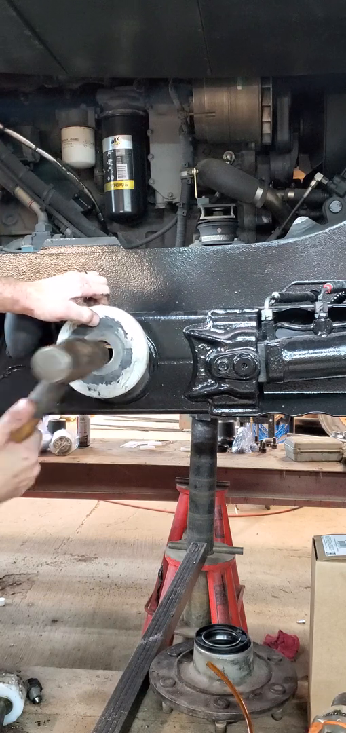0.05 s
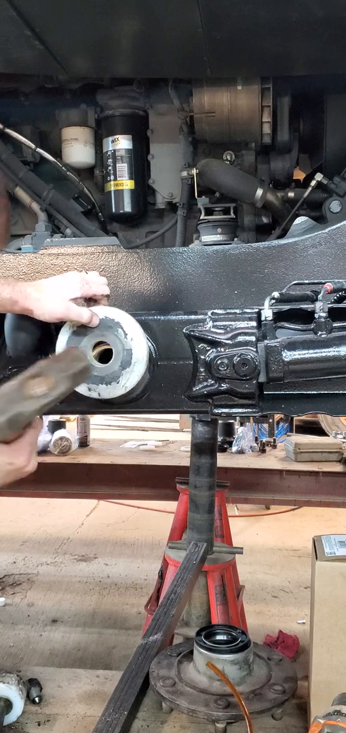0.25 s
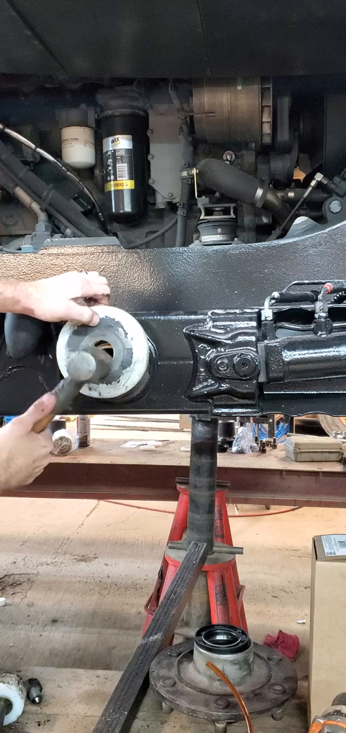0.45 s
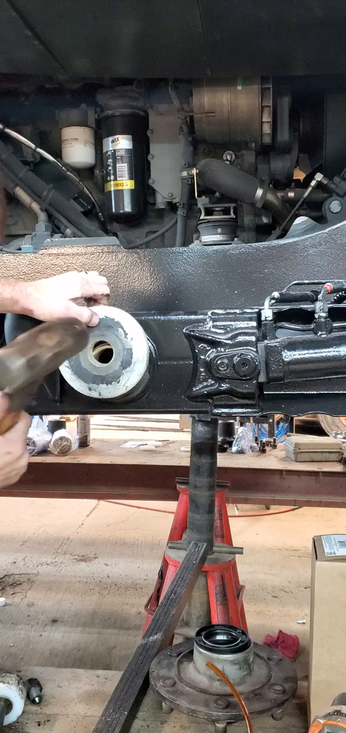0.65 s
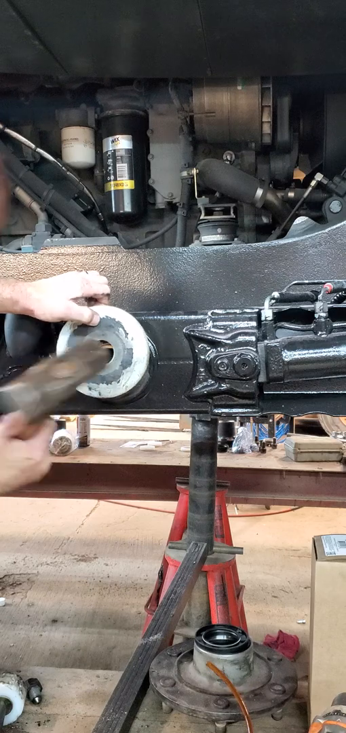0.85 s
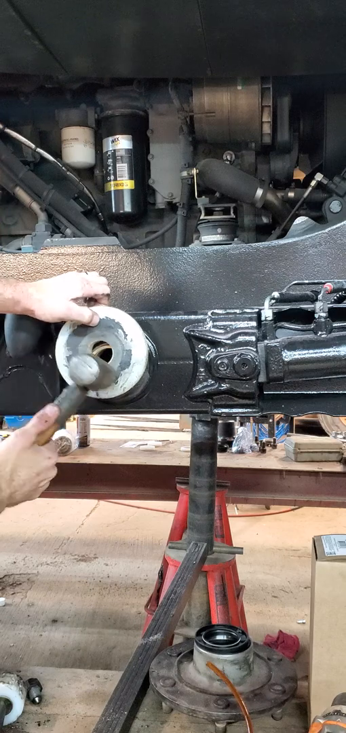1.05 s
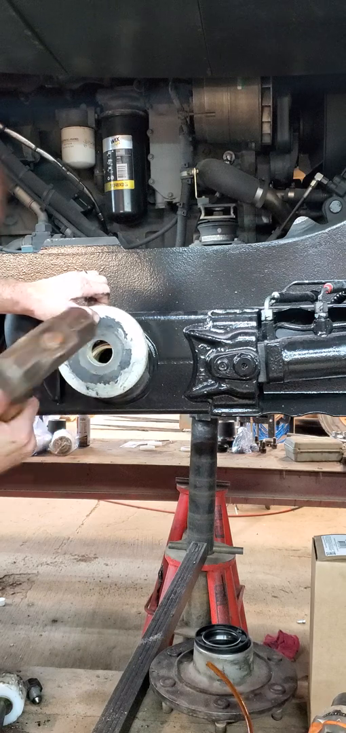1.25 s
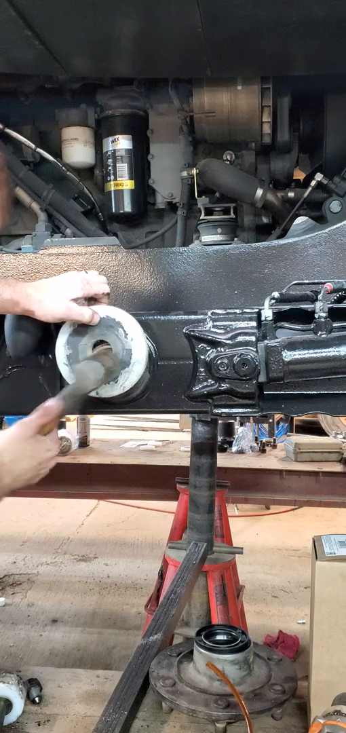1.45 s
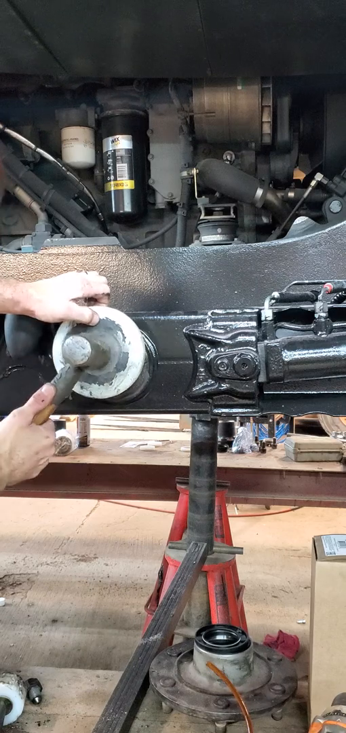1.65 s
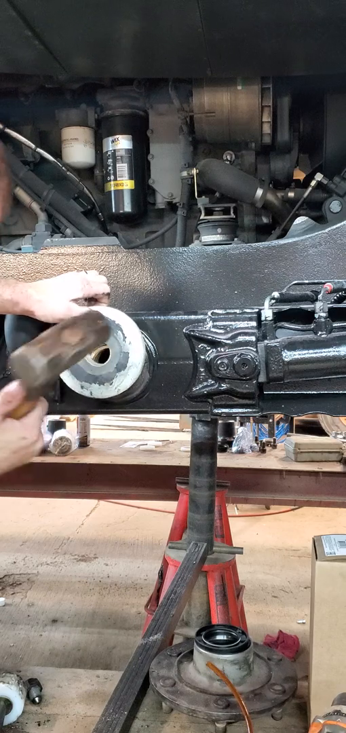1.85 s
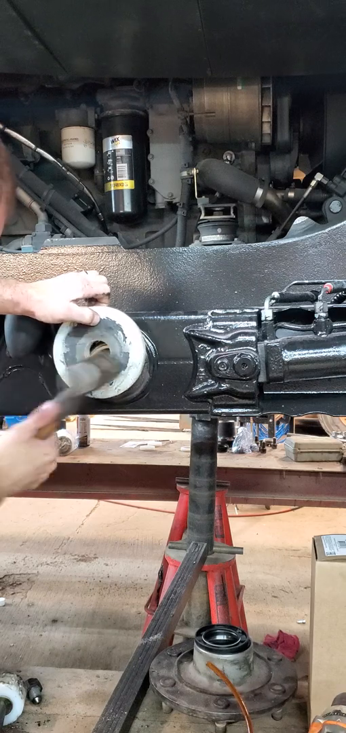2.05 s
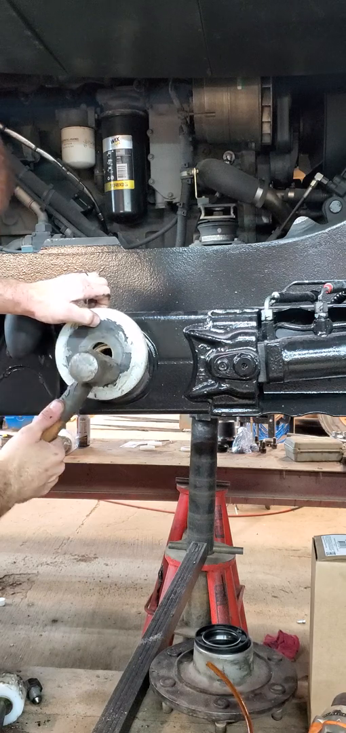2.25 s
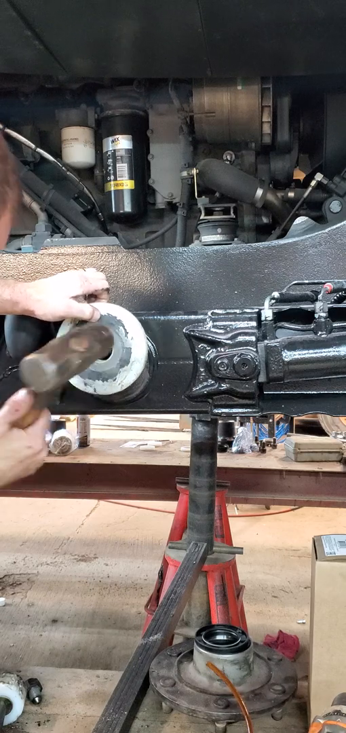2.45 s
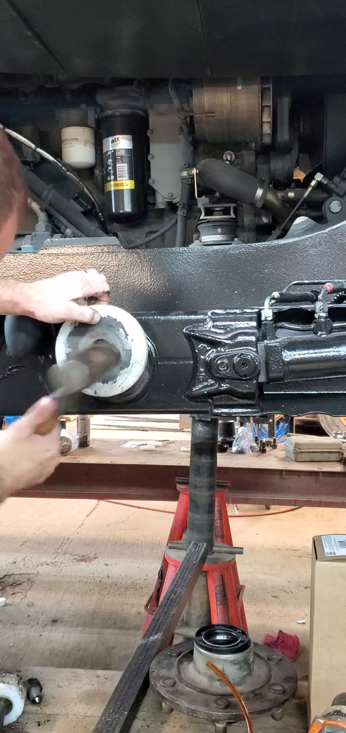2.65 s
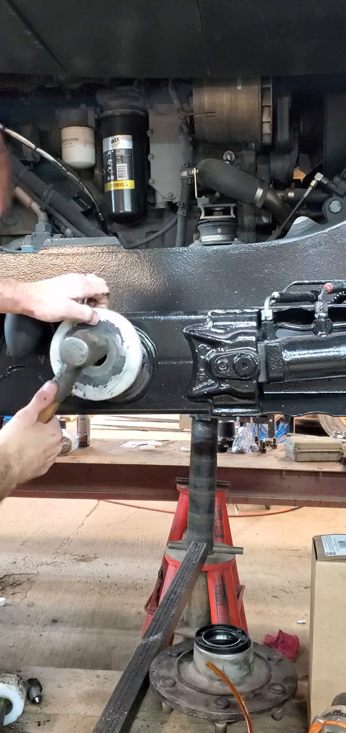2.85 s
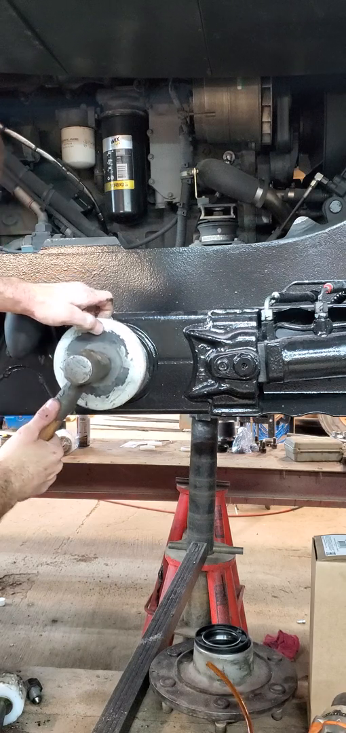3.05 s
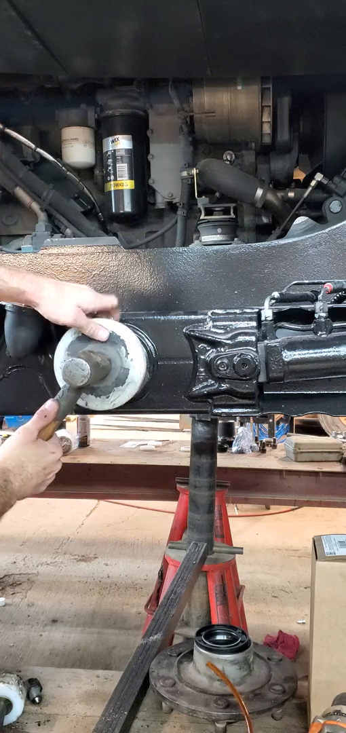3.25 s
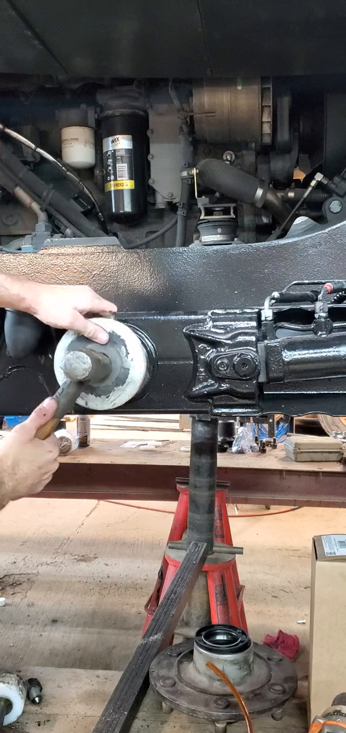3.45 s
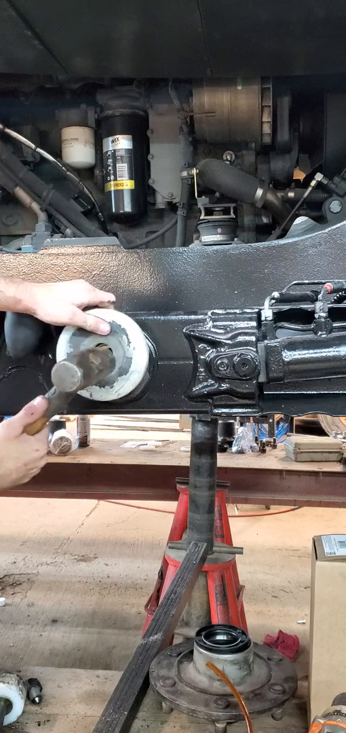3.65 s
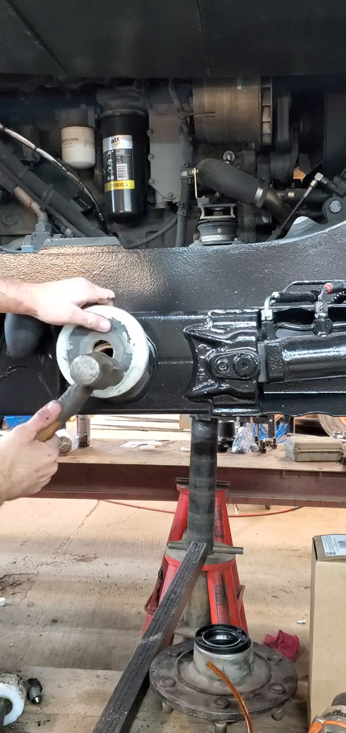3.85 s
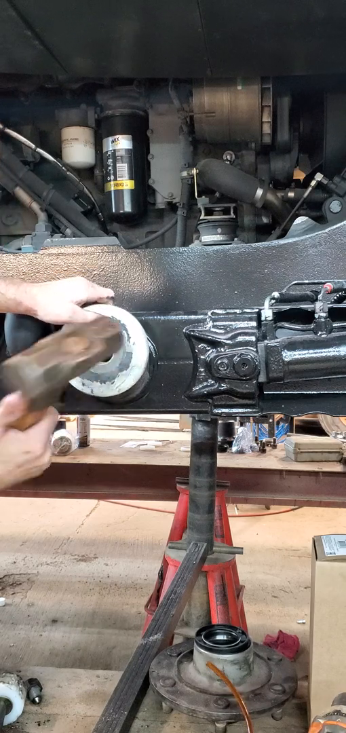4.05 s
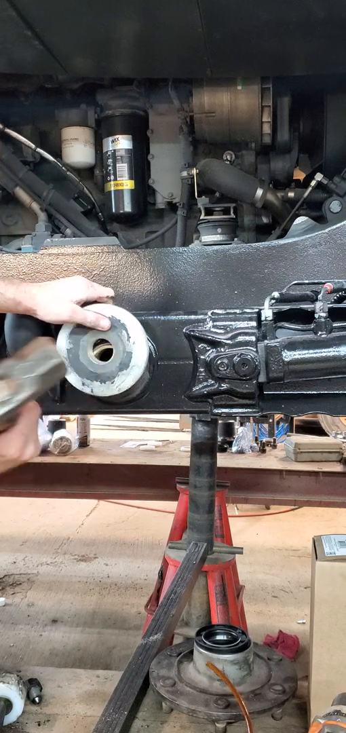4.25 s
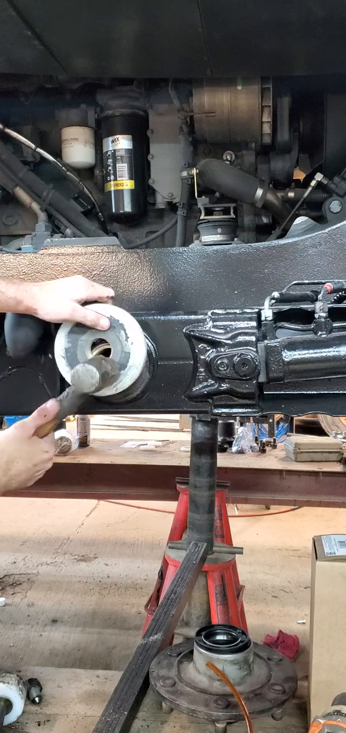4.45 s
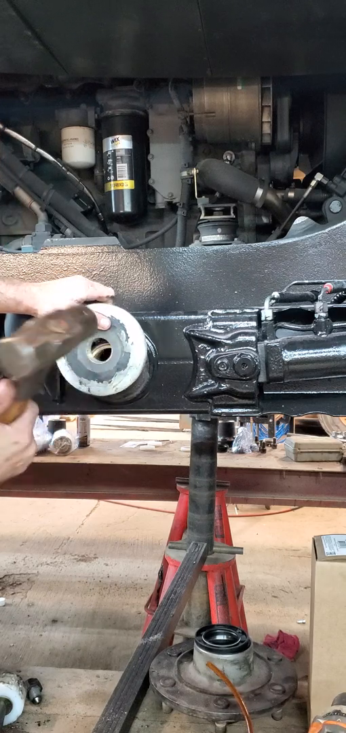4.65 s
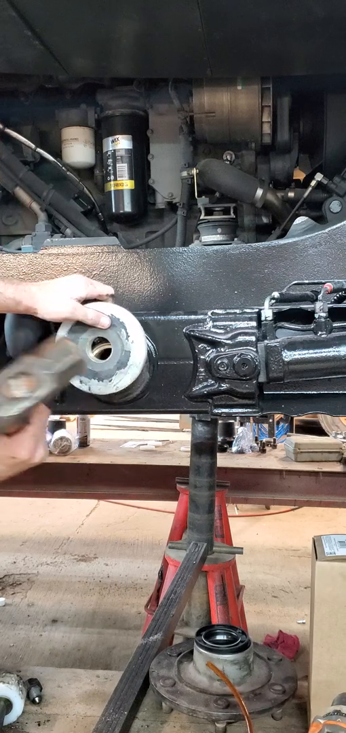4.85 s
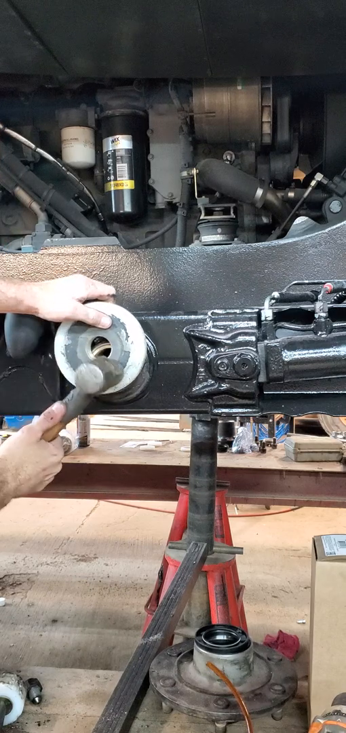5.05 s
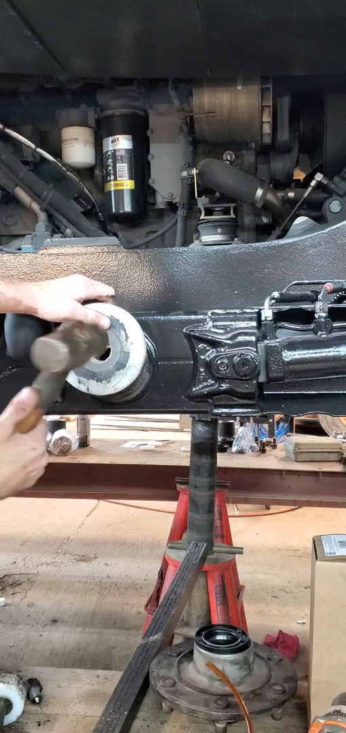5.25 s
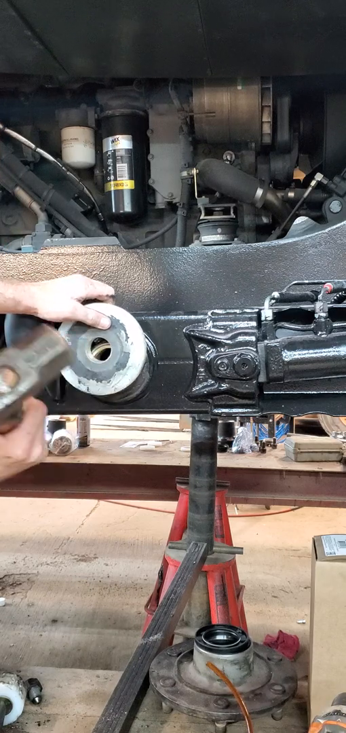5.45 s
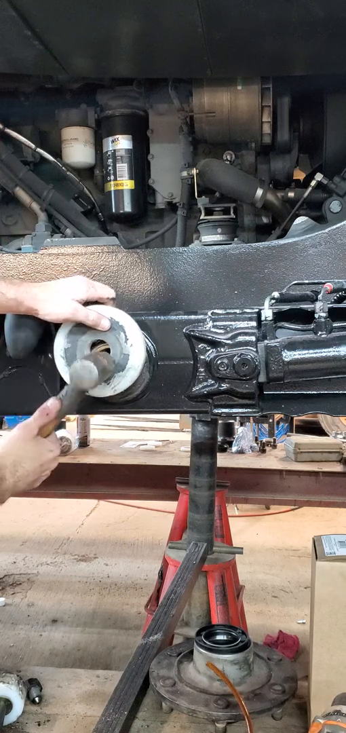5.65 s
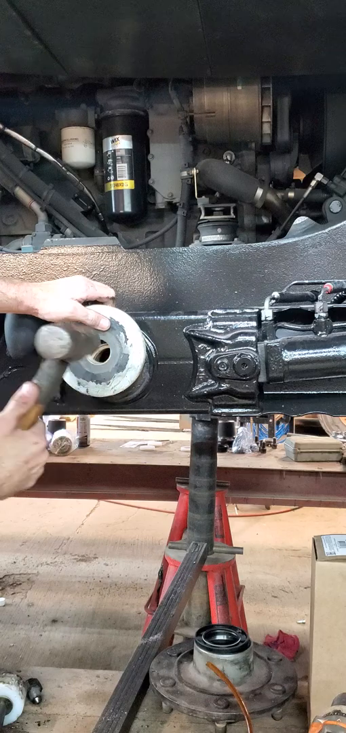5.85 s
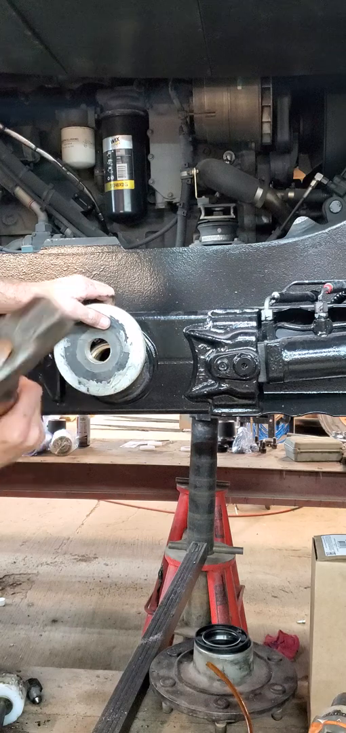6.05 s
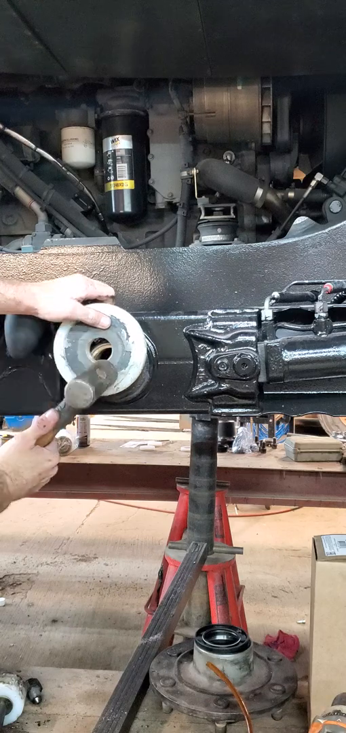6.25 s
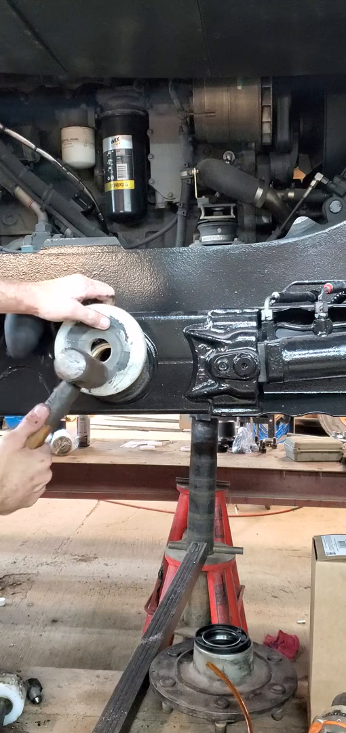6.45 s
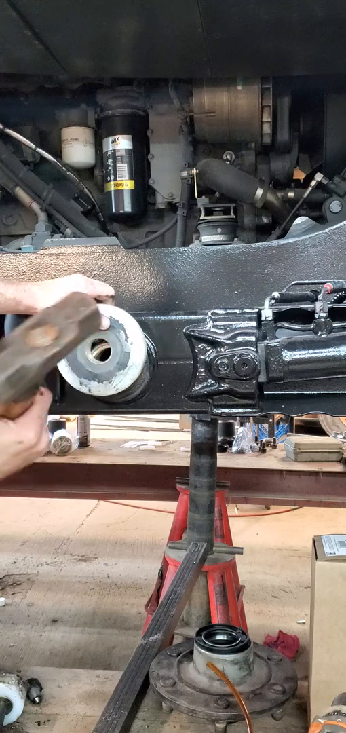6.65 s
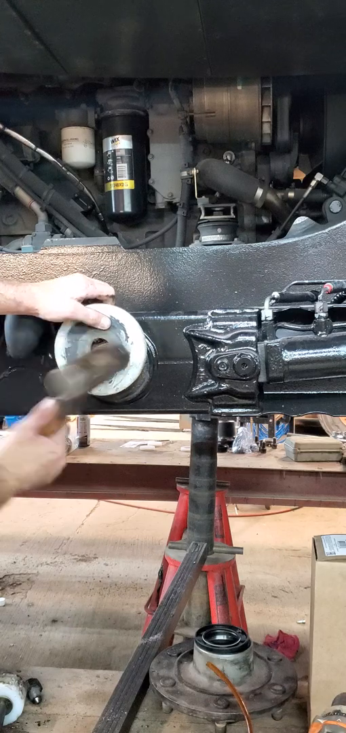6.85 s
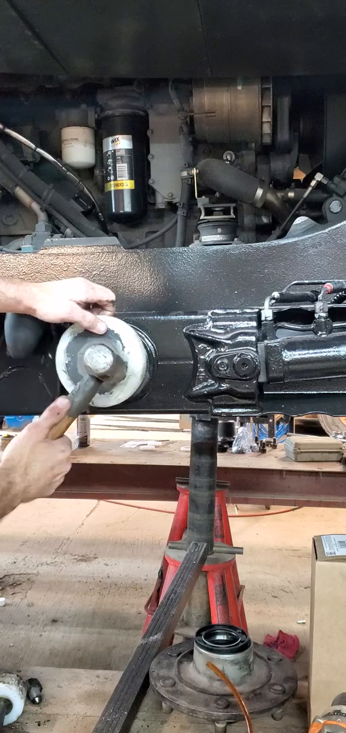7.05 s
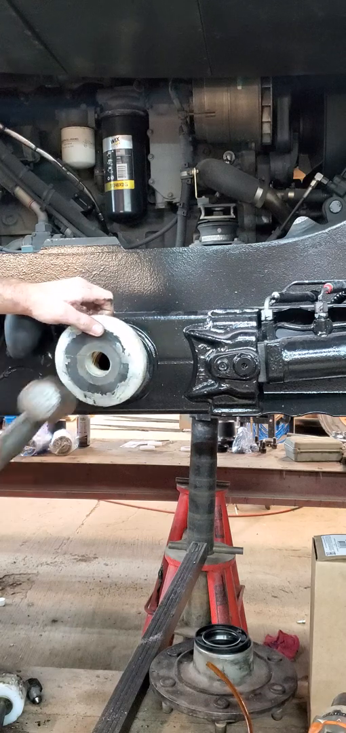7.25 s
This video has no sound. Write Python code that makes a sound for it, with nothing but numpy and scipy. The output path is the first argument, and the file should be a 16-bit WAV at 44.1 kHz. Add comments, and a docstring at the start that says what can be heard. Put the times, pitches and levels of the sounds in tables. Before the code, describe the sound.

Close, loud metal hammering in a hard, echoing workshop. The tail of a previous blow is already ringing, then strikes come roughly every 0.6 seconds. The middle has a one-second pause with a brief gritty slide of metal, after which the blows resume. Later hits are harder and brighter with more low thump and ringing. Small dull plate rattles follow some blows; quiet rumbling air lies underneath.

```python
"""Hammering a bushing into a machine beam

A steel hammer drives a bushing through a driver plate in a hard-walled workshop: one blow has just fallen,
eleven follow. Short bursts of micro-contacts make the cracks; decaying sines make the beam boom and clang;
decaying bands of noise make the steel and workshop ring on. The loose plate chatters after three of the
blows (filtered bursts) and is once slid back (gritty filtered noise), over quiet air with a faint hum."""
import sys
import numpy as np
from scipy import signal
from scipy.fft import rfft, irfft, next_fast_len
from scipy.io import wavfile
from scipy.ndimage import uniform_filter1d

SR = 44100
rng = np.random.default_rng(int(sys.argv[2]) if len(sys.argv) > 2 else 0)


def master(y):
    """Save y as 16-bit WAV."""
    cut = np.clip(np.atleast_2d(y).T, -1, 1)
    pcm = np.round(cut * 32767)  # scale
    wavfile.write(sys.argv[1], SR, pcm.astype(np.int16))


N = 322801
TIME = np.arange(N) / SR
RING_TIME = np.arange(65536) / SR
SIDES = np.array([[.5], [-.5]])  # left and right share of a left-minus-right difference

# modes of the beam and its fittings: f/Hz, level/dB, t60/s, left minus right/dB
BEAM_MODES = [(103, -49, .45, 0), (141, -44, .35, 0), (181, -37, .3, 0), (195, -37, .5, 0),
              (257, -21.5, .14, -1), (280, -24.5, .19, -1), (308, -24, .3, 0), (320, -23, .17, 0),
              (393, -44, .35, 0), (463, -34, .28, -2), (510, -30, .18, 0), (549, -27.5, .2, -3),
              (581, -22.5, .17, -4), (630, -26, .16, -2), (661, -23, .21, 0), (736, -24, .2, -1),
              (770, -26, .15, -1), (853, -37, .24, -4), (938, -26.5, .27, 8), (1164, -35, .3, -4),
              (1445, -39, .38, -4), (1609, -38, .36, -5), (1979, -34, .3, -5), (2080, -29, .42, -2),
              (2122, -28.5, .45, -4), (2140, -28.5, .7, -4), (2187, -29, .55, -4), (2262, -26, .28, -7),
              (2395, -37, .33, 2), (4990, -42, .55, 0)]


def undb(db):
    """Decibels to gain."""
    return 10 ** (np.asarray(db) / 20)


def unit(x):
    """Scale to rms 1."""
    return x / np.sqrt(np.mean(x ** 2))


def fade(t, t60):
    """Exponential decay by 60 dB in t60 seconds."""
    return np.exp(-np.log(1000) * t / t60)


def over(f, hz, values):
    """Join spectrum points on a log-frequency axis."""
    return np.interp(np.log(np.maximum(f, 1)), np.log(hz), values)


def colour(x, hz, db, pan_db=None):
    """Causal (minimum-phase) filter through f/Hz, gain/dB points, optionally leaning by frequency."""
    size = next_fast_len(x.shape[-1] // 2 + 1024) * 2
    f = np.arange(size // 2 + 1) * SR / size
    gain_db = over(f, hz, db)
    if pan_db is not None:
        gain_db = gain_db + SIDES * over(f, hz, pan_db)
    # folding the cepstrum onto positive time gives the phase that makes the filter causal
    cepstrum = irfft(np.log(undb(gain_db)))
    cepstrum[..., 1:size // 2] *= 2
    cepstrum[..., size // 2 + 1:] = 0
    response = np.exp(rfft(cepstrum))
    return irfft(rfft(x, size) * response)[..., :x.shape[-1]]


def diffuse(size, alike_hz=650):
    """Spectrum of unit noise at two close microphones: nearly alike in the bass, unrelated in the treble."""
    f = np.arange(size // 2 + 1) * SR / size
    alike = .9 / (1 + (f / alike_hz) ** 4)
    mid, side = rfft(rng.standard_normal((2, size)))
    shared = mid * np.sqrt((1 + alike) / 2)
    opposed = side * np.sqrt((1 - alike) / 2)
    return f, shared + 2 * SIDES * opposed


def noise():
    """Diffuse noise for the whole scene."""
    _, spectrum = diffuse(size=2 * next_fast_len(N // 2 + 1))
    return irfft(spectrum)[:, :N]


def add(out, x, s):
    """Mix x into out from time s on, dropping what lies outside the scene."""
    start = int(round(s * SR))
    a, b = max(start, 0), min(start + x.shape[-1], N)
    if b > a:
        out[:, a:b] += x[..., a - start:b - start]


def workshop_air(air_db=-67):
    """Quiet rumble of filtered noise with a faint machine hum of steady sines."""
    # relative spectrum of the air: f/Hz, density/dB per Hz
    air = [(25, -18), (45, -16.5), (72, -10), (120, -7.5), (270, -8), (450, -18.5), (900, -21), (2200, -25),
           (5000, -29), (7800, -33.5), (9500, -46.5), (16000, -50.5)]
    # steady hum: f/Hz, rms level/dB
    hum_tones = [(72, -75), (172.3, -70), (279.9, -73), (360.7, -84.5)]
    hum = 0
    for hz, db in hum_tones:
        hum = hum + undb(db) * np.sqrt(2) * np.sin(2 * np.pi * (hz * TIME + rng.random()))
    rumble = unit(colour(noise(), *np.transpose(air)))
    return undb(air_db) * rumble + hum


def plate_slide(rub_db=-40, grit_db=-0.5):
    """The plate rubs over its seat, gathers speed and slows: fine, slightly gritty friction noise."""
    # relative spectrum of the rub: f/Hz, level/dB, left minus right/dB
    rub = [(100, -11.5, 3), (400, -4.5, -2), (750, 1, -2.5), (1200, -3.5, -2), (2000, 9.5, -5),
           (3300, -5.5, 1), (7690, -13, 4), (13000, -17, 5.5), (16000, -45.5, -14.5)]
    start_s, attack_s, slows_db_per_s = 3.535, .12, 80
    seated_s = 3.76  # a blow seats the plate and ends the rub
    age = TIME - start_s
    attack = np.sin(np.pi / 2 * np.clip(age / attack_s, 0, 1)) ** 2
    slowing = undb(-slows_db_per_s * np.maximum(age - attack_s, 0))
    release = slowing * (TIME < seated_s)
    grit = undb(grit_db * unit(uniform_filter1d(rng.standard_normal(N), size=150)))
    friction = unit(colour(noise() * grit, *np.transpose(rub)))
    return undb(rub_db) * attack * release * friction


def shop(early_t60=0.29, build_s=0.0019, bass_lag_s=0.011, bass_hz=700, ripple_db=2.0):
    """Dense ringing of noise bands: near surfaces die fast, the hall slowly; the lows build up last."""
    # ringing of steel and workshop: f/Hz, early level/dB (raised 6.5 dB below), late level/dB,
    # late t60/s, left minus right/dB
    bands = [(50, -47, -39, 0.82, -2), (179, -34.5, -24.5, 0.9, 5), (288, -23.5, -13.5, 1.08, -2.5),
             (361.4, -23, -20, 0.59, 1), (605, -9, -10.5, 0.6, -1), (1070, -22, -18, 0.57, -2.5),
             (1490, -22, -19.5, 0.73, -1), (1837, -16, -21.5, 0.83, -5), (2166, -12, -8, 0.93, -4.5),
             (2336, -17.5, -17, 0.99, -7.5), (2440, -19, -17.5, 0.87, -2.5), (2970, -29, -24, 0.84, 1),
             (4300, -29.5, -30, 0.98, 1.5), (4960, -24, -26, 0.97, 0.5), (6940, -27.5, -31.5, 0.91, 4),
             (7620, -29, -27.5, 0.76, 11.5), (9100, -34.5, -42, 0.69, -5.5), (11900, -31, -37.5, .58, 10.5),
             (16000, -38.5, -55.5, .5, 9.5)]
    hz, early_db, late_db, t60, pan_db = np.transpose(bands)
    t = RING_TIME
    f, spectrum = diffuse(size=len(t))
    # where the blow lands decides which clusters of high modes speak
    ripple = unit(uniform_filter1d(rng.standard_normal(len(f)), size=130))
    ripple = ripple * np.clip(f / 2500 - .5, 0, 1)
    gain_db = over(f, hz, late_db) + SIDES * over(f, hz, pan_db) + ripple_db * ripple
    spectrum = spectrum * undb(gain_db)
    out = 0
    for k, share in enumerate(np.eye(len(hz))):
        band = irfft(spectrum * over(f, hz, share))
        rise_s = build_s + bass_lag_s / (1 + (hz[k] / bass_hz) ** 2)
        build = 1 - np.exp(-t / rise_s)
        early = undb(early_db[k] - late_db[k] + 6.5) * fade(t, early_t60)
        out = out + band * build * np.hypot(early, fade(t, t60[k]))
    return out


def contact(rise_s, t60, lag_s, apart):
    """A burst of micro-contacts over some milliseconds, of about unit energy, later at the right microphone."""
    t = RING_TIME[:2048]
    envelope = (1 - np.exp(-(t / rise_s) ** 2)) * fade(t, t60)
    shared, left, right = rng.standard_normal((3, len(t))) * envelope
    late_right = np.interp(t - lag_s, t, shared + apart * right, left=0)
    burst = np.array([shared + apart * left, late_right])
    # so short a push reaches all frequencies almost equally
    spectrum = rfft(burst)
    smooth = np.sqrt(uniform_filter1d(np.abs(spectrum) ** 2, size=50, axis=-1))
    burst = irfft(spectrum / smooth)
    burst[:, len(t) // 2:] = 0
    return burst


def plate_knocks(knock_db=25, room_db=-22):
    """Dull little contacts of the loose plate on its seat, each with a faint answer from the workshop."""
    # knocks: t/s, relative level/dB
    knocks = [(2.135, -4), (2.141, -6), (2.176, -19.5), (2.779, -8), (2.828, -11), (2.882, -13.5),
              (2.892, -14.5), (2.994, -14), (3.01, -14.5), (7.075, -9.5), (7.168, -16), (7.244, -25)]
    # spectrum of a knock: f/Hz, level/dB
    knock_tone = [(50, -44.5), (250, -25), (500, -13), (900, -11.5), (1450, -5.5), (2050, -14), (2700, -21),
                  (8000, -41.5), (16000, -59)]
    out, room = np.zeros((2, N)), shop()
    for s, db in knocks:
        burst = contact(rise_s=.0005, t60=.012, lag_s=.00015, apart=.35)
        knock = undb(db + knock_db) * colour(burst, *np.transpose(knock_tone))
        add(out, knock, s)
        add(out, undb(room_db) * signal.fftconvolve(knock, room, axes=1), s)
    return out


def thud(t60=.11, low_hz=35, high_hz=110, alike_hz=90):
    """The whole machine jolts on its stand: a decaying low noise burst of unit energy."""
    _, spectrum = diffuse(size=len(RING_TIME), alike_hz=alike_hz)
    push = irfft(spectrum) * fade(RING_TIME, t60)
    band = signal.butter(1, [low_hz, high_hz], "bandpass", fs=SR, output="sos")
    low = signal.sosfilt(band, push)
    return low / np.sqrt(np.sum(low ** 2))


def beam(phases, detune=.0008, spread_hz=1100, linger_db=-26, linger_t60=0.93):
    """The beam's modes swell, fade and linger as sines; their first strong reflection piles on top."""
    swell_s, echo_s = .004, .017
    t, out = RING_TIME, 0
    ages = np.array([t, np.maximum(t - echo_s, 0)])  # since the blow and since its reflection
    swell = 1 - np.exp(-(ages / swell_s) ** 2)
    linger = undb(linger_db) * fade(ages, linger_t60)
    for (hz, db, t60, pan_db), phase in zip(BEAM_MODES, phases):
        pitch = hz * (1 + detune * rng.standard_normal())
        # high modes reach the two microphones out of step
        phase_lag = SIDES * min((hz / spread_hz) ** 2 / 2, np.pi)
        # the higher the mode, the more it matters where the blow lands
        strength_db = db + min(hz / spread_hz, 3) * rng.standard_normal()
        envelope = np.sum(swell * (fade(ages, t60) + linger), axis=0)
        tone = np.sin(2 * np.pi * pitch * t + phase + phase_lag)
        out = out + undb(strength_db + SIDES * pan_db) * envelope * tone
    return out


def hammer(crack_db=25.5, beam_db=-5.5, shop_db=0.0, thud_db=-17):
    """Each blow cracks, jolts the stand and rings beam and shop; hard contact brightens the crack."""
    # blows, levels against a usual one: t/s, strength/dB, free ring of the steel/dB, clang of the plate/dB,
    # hardness of the contact/dB, jolt of the stand/dB, crack left minus right/dB
    blows = [(-0.2, -1, 1, 0.5, 0, 0, 0), (0.356, -1.05, -0.35, 1, 1, -12, 0.5),
             (0.902, 3.8, -1, -1, .5, -12.5, 5), (1.4787, 2.5, 0, -.5, 6, 0.5, -8),
             (2.082, -.5, 0, 0, 2.5, 2.5, -2.5), (2.688, 2, -3, 1.5, 5, 2.5, 0),
             (3.7521, 2, -5.5, -6.5, 2, -16, 3.5), (4.3631, -3, 0, 4.5, 2, 3.5, -2.5),
             (4.9939, 0.5, 2, 0.5, 4, 5.5, -1.5), (5.6195, -2.5, 1, -1.5, 6.5, 4, 1.5),
             (6.26, 0, 2, 1, 7, 11, 4), (6.9124, 1, -1.6, 1.5, 1.5, 8, -3)]
    # crack of steel on steel: f/Hz, level/dB, left minus right/dB
    crack_tone = [(100, -18.5, 4), (700, -16.5, 7.5), (1040, -4.5, -2.5), (1450, 1.5, -5.5),
                  (2200, -1, -5.5), (2730, -9, 3), (4100, -18, 7), (5880, -12.5, -11.5),
                  (7000, -18.5, 17.5), (9300, -22.5, 7), (12600, -19.5, 8.5), (16000, -27, 6)]
    # how strongly a usual blow drives beam and workshop: f/Hz, level/dB
    drive = [(700, -4), (1500, -.5), (2200, -2), (3500, 0.44), (5100, -1.5), (7200, -1.5), (11000, -6.5)]
    crack_follows = .1  # dB of crack per dB of strength
    out = np.zeros((2, N))
    phases = rng.uniform(0, 2 * np.pi, len(BEAM_MODES))
    hz, db, pan_db = np.transpose(crack_tone)
    drive_hz, drive_db = np.transpose(drive)
    # harder contact moves energy up across this range (Hz); the lows lose .55 of the change
    hardening = over(hz, (2300, 5000), [0, 1]) - .55
    # the hand on the plate damps or frees the ring, fully above this range (Hz)
    freeing = over(drive_hz, (700, 2200), [0, 1])
    # a tilted plate clangs, a flat one hardly does: lower edge, centre, upper edge (Hz)
    clanging = over(drive_hz, (698, 1450, 2300), [0, 1, 0])
    for s, strength_db, free_db, clang_db, hard_db, jolt_db, lean_db in blows:
        burst = contact(rise_s=0.00043, t60=0.0058, lag_s=.00018, apart=0.15)
        crack = colour(burst, hz, db + hard_db * hardening, pan_db + lean_db)
        ring = undb(beam_db) * beam(phases) + undb(shop_db) * shop()
        tone_db = drive_db + free_db * freeing + clang_db * clanging
        add(out, undb(crack_db + crack_follows * strength_db) * crack, s)
        add(out, undb(strength_db) * colour(ring, drive_hz, tone_db), s)
        add(out, undb(thud_db + jolt_db) * thud(), s)
    return out


def scene():
    """The still workshop, the driver plate and the hammer."""
    return workshop_air() + plate_slide() + plate_knocks() + hammer()


def record(dry, ceiling=.85, top_hz=15800):
    """The cracks overload the microphone (soft clipping); the deepest bass and the top are cut."""
    overloaded = ceiling * np.tanh(dry / ceiling)
    bass_cut = signal.butter(1, 35, "highpass", fs=SR, output="sos")
    top_cut = signal.ellip(8, .2, 70, top_hz, fs=SR, output="sos")
    return signal.sosfilt(top_cut, signal.sosfilt(bass_cut, overloaded))


dry = scene()
out = record(dry)
master(out)
```